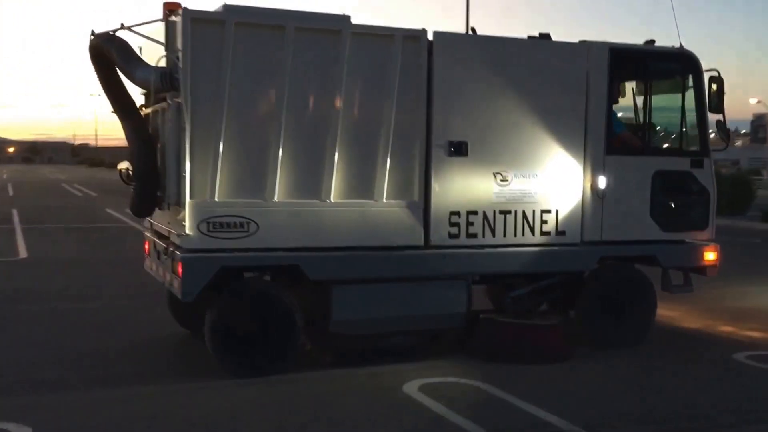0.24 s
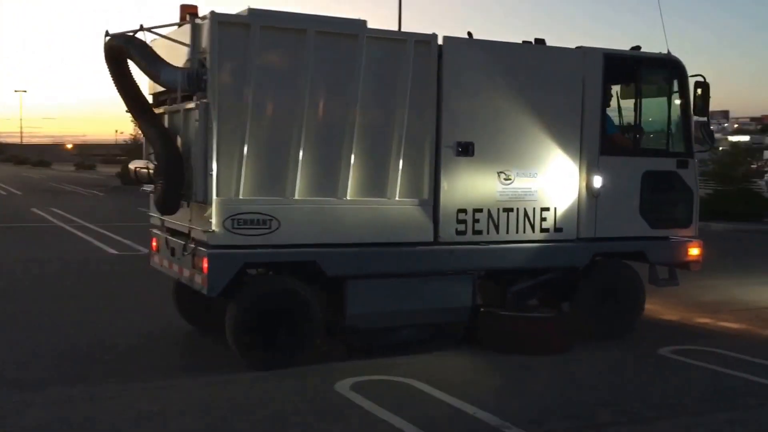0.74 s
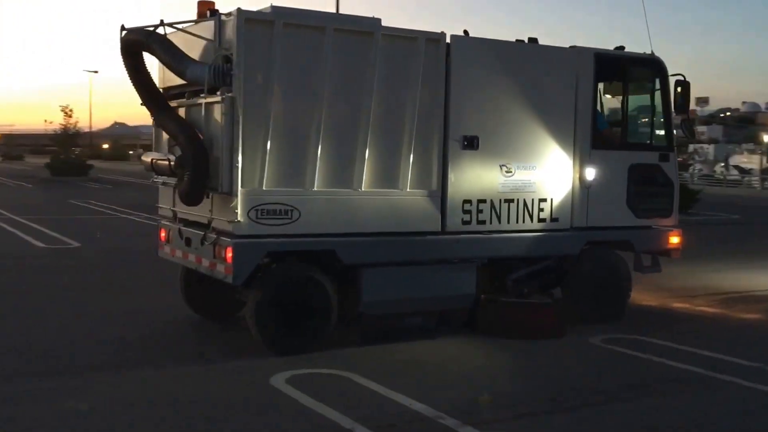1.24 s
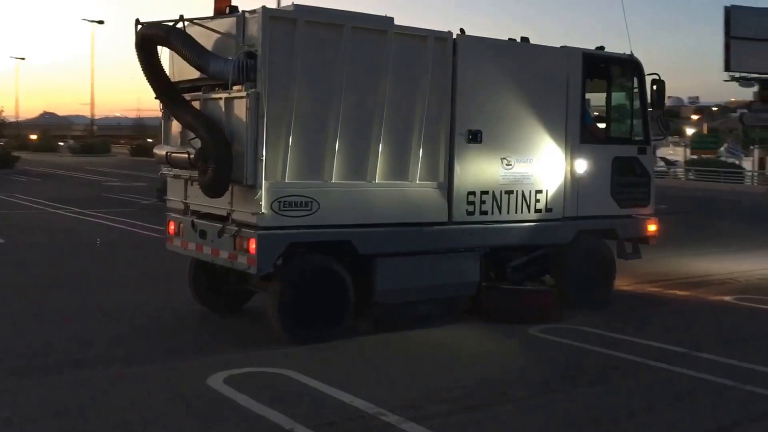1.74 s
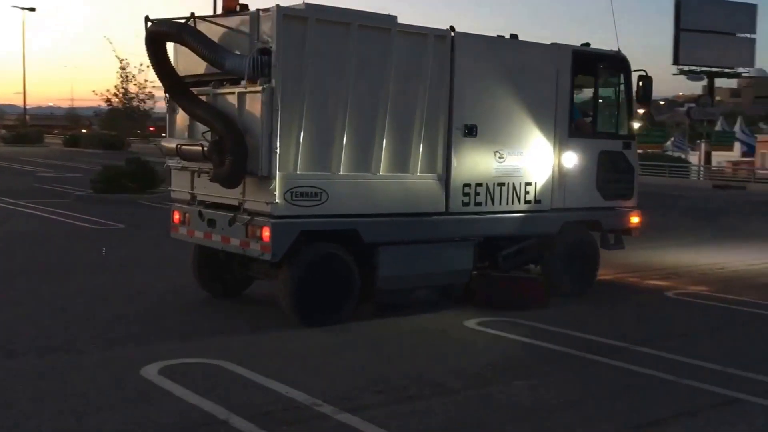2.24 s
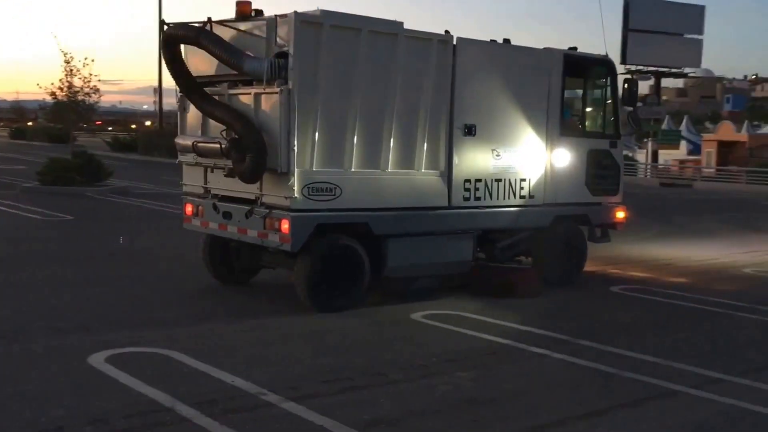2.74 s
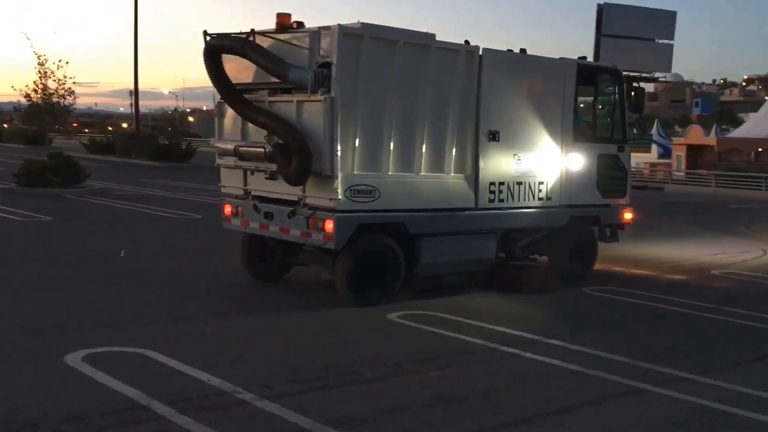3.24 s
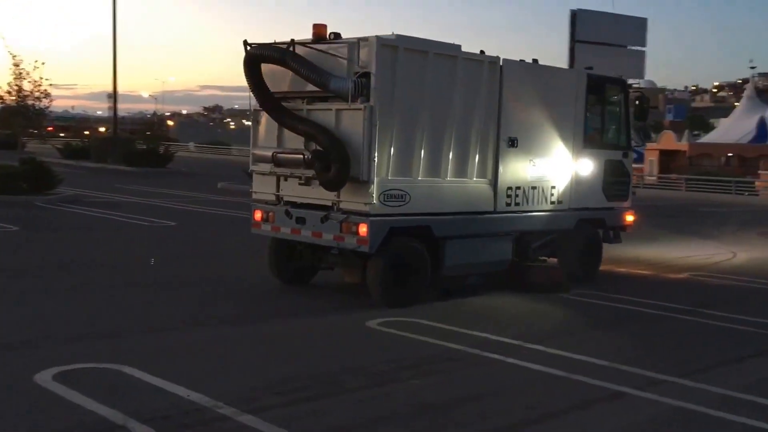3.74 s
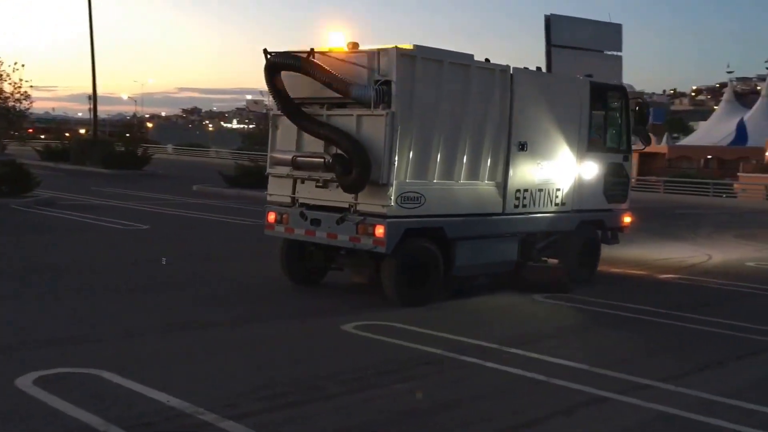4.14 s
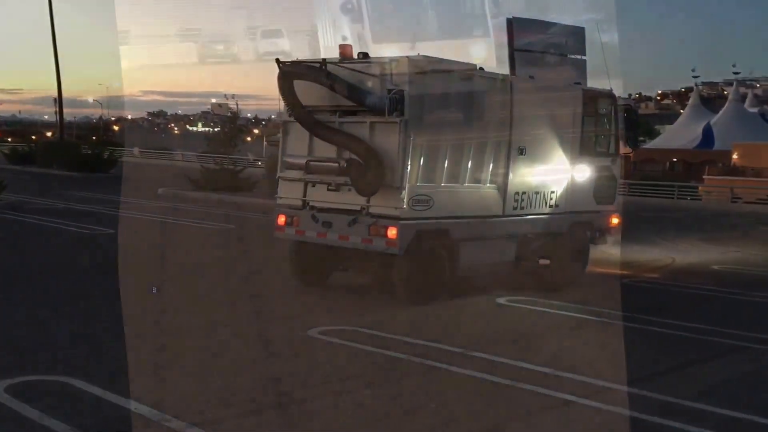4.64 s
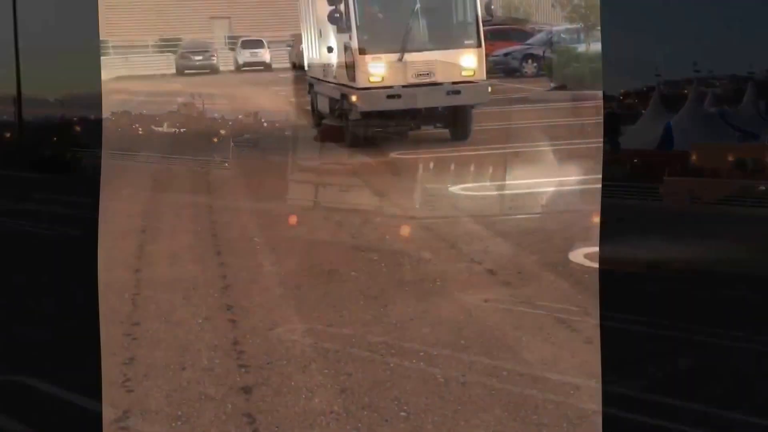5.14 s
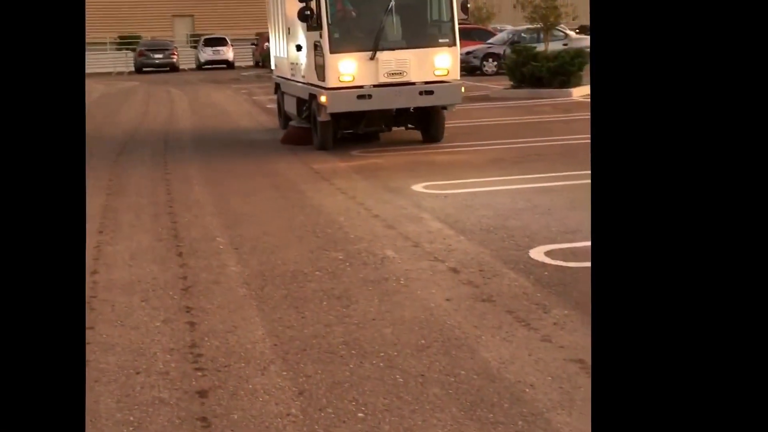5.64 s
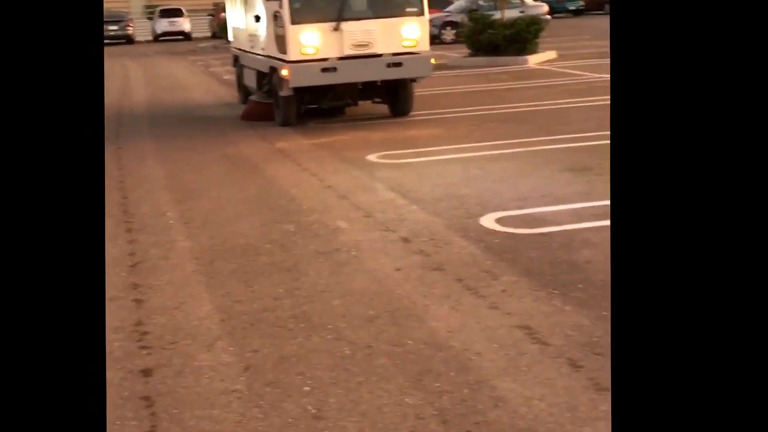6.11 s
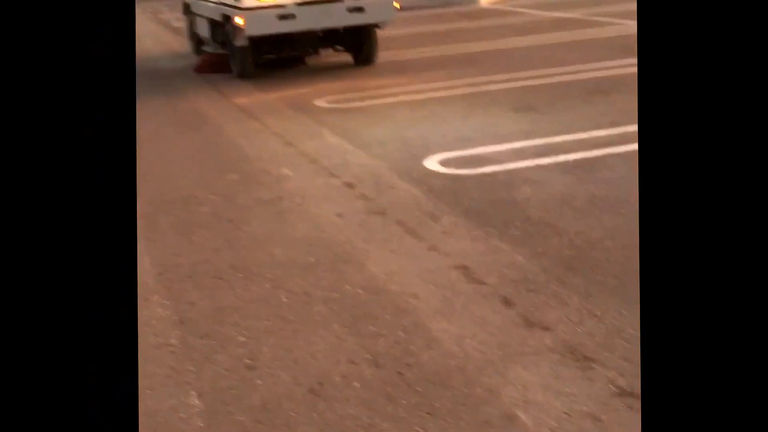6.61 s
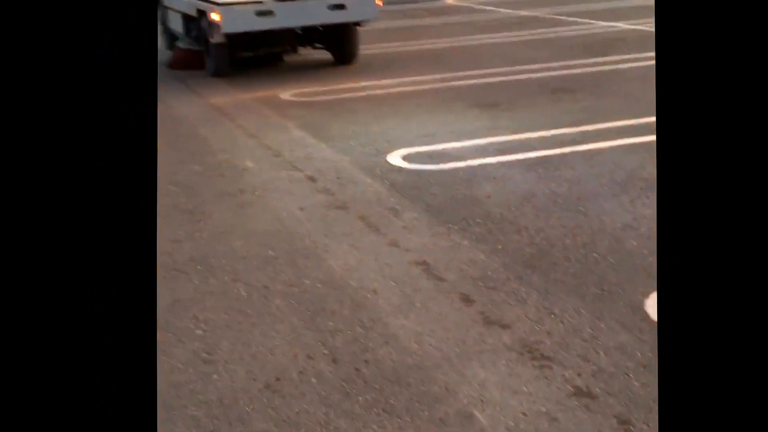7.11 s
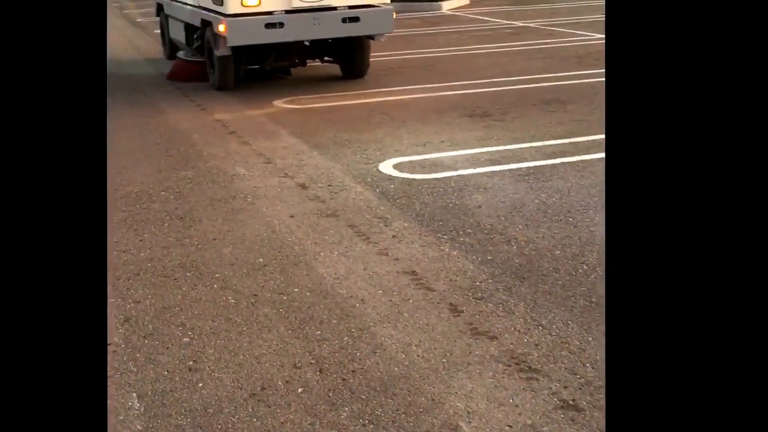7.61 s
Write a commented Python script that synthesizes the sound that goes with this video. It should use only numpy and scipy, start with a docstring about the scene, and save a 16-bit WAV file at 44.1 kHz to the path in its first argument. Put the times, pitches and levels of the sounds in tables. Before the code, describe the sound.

Steady low diesel drone around a hundred hertz, with blower whine, airy roar and bristle hiss; faint panel rattles, then a thinner, less boomy frontal view.

```python
"""A throbbing engine, a rush of air and hissing brooms are heard at once: a street sweeper on a parking lot.
It is heard from the side, then from behind as it drives off and, after a cross-fade, coming head-on.
The four-cylinder engine and its cooling fan, the suction blower, a pump and the duct whistles are drifting tones.
Exhaust flutter, rumble, hopper air and brooms are coloured noise; now and then steel panels rattle."""
import sys
import numpy as np
from scipy import signal
from scipy.fft import rfft, irfft, next_fast_len
from scipy.io import wavfile
from scipy.ndimage import uniform_filter1d

SR = 44100
rng = np.random.default_rng(int(sys.argv[2]) if len(sys.argv) > 2 else 0)


def persist_wave(psi):
    """Save psi, clipped to +-1, as 16-bit WAV."""
    counts = np.round(np.clip(psi, -1, 1) * 32767).astype(np.int16)
    wavfile.write(sys.argv[1], SR, np.atleast_2d(counts).T)


N = 347067
T = np.arange(N) / SR
HZ = np.fft.rfftfreq(N, 1 / SR)

# strength of each source at the reference distance: name: (side level/dB, rear level/dB, front level/dB)
SOURCE_LEVELS = { "firing": (-27.5, -28, -24.5), "boom": (-18, -20, -30), "fan": (-30.5, -29, -40.5),
                 "blower hum": (-43.5, -39, -47.5), "blower whine": (-47.5, -34.5, -45.5),
                 "pump whine": (-38.5, -42, -50.5), "flutter": (-27, -25.5, -29), "rumble": (-30, -27, -30),
                 "roar": (-28.5, -27.5, -32.5), "brooms": (-27.5, -28.5, -32.5), }
# weaker engine tones: (multiple of the firing rate, side level/dB, rear level/dB, front level/dB)
WEAK_ORDERS = [(.75, -45, -45, -54), (1.25, -35, -34, -48), (1.5, -31, -36.5, -38.5), (2.25, -63, -59, -54),
               (2.5, -44, -58, -55), (2.75, -54, -51, -50), (3, -60, -48, -41), (3.25, -39, -59, -57),
               (3.5, -53, -39.5, -51), (4, -56, -43, -43), (5.25, -53, -45, -40.5), (5.75, -42, -45, -49),
               (6.25, -48, -49, -59), (6.5, -42, -47, -44.5), (7.5, -45.5, -52, -50)]
# blower overtones: (multiple of the blade rate, then relative level/dB from the side, rear and front)
BLOWER_OVERTONES = [(2, 1.5, 1, 2), (3, -15, -11, -17), (4, -13, -9, -14)]
# pump tones: (multiple of the blade rate, then relative level/dB from the side, rear and front)
PUMP_TONES = [(1.967, 0, 0, 0), (4.917, -18, -14, -15)]
# air whistling at gaps in the ducts, and one more pump tone at 2763 Hz: (start t/s, end t/s, f/Hz, width/Hz,
# level/dB)
DUCT_WHISTLES = [(0, 7.87, 1641, 18, -47), (0, 4.8, 1700, 60, -44), (0, 4.7, 1240, 30, -45),
                 (.5, 4.5, 2250, 20, -51), (.9, 4.3, 2853, 7, -46), (.4, 3.2, 2808, 14, -53),
                 (4.0, 5.1, 2763, 5, -46), (1.5, 4.8, 5582, 40, -56), (4.9, 7.87, 1700, 50, -45),
                 (5.2, 7.87, 2120, 30, -50), (5.2, 7.87, 2710, 18, -53), (6.0, 6.75, 4285, 30, -46),
                 (5.3, 7.87, 8904, 70, -58)]
# colour of the exhaust flutter: (f/Hz, relative level/dB per Hz)
FLUTTER_SPECTRUM = [(10, -26), (25, -25), (42, -9), (62, 2.5), (92, -1), (120, -5.5), (150, -21),
                    (300, -55)]
# colour of the engine rumble: (f/Hz, then relative level/dB per Hz from the side, rear and front)
RUMBLE_SPECTRA = [(70, -30, -32, -26), (127, -1, 1, 2.5), (145, 0.5, -5, 2.5), (175, -3, 0.5, 3),
                  (203, 3, -1, 0), (227, -1.5, -5.5, -3.5), (236, 4, -4, 0), (318, 0.5, -4.5, -7),
                  (410, -8, -6.5, -6), (467, -12.5, -28.5, -15), (596, -39, -30, -19)]
# colour of the hopper's air roar from each face: (f/Hz, relative level/dB per Hz)
AIR_SIDE = [(300, -50), (490, -18), (560, 2), (670, -0.5), (770, -0.5), (1000, 1.5), (1330, 1), (1480, -4),
            (1660, 3.5), (1900, -2), (2260, 1), (2620, -10), (3000, -10), (3900, -38)]
AIR_REAR = [(300, -29), (490, -6.5), (640, -3), (750, -4.5), (970, 0), (1220, -3), (1430, -7.5), (1650, -1),
            (1800, -4), (1950, -3.5), (2270, -4), (2550, -10), (2850, -6), (3900, -54)]
AIR_FRONT = [(300, -38), (490, -4.5), (590, 1), (680, 5.5), (800, 0.5), (950, 1), (1050, -4.5), (1250, 3.5),
             (1480, 1), (1680, 3.5), (1850, 1.5), (2150, -2.5), (2900, -7.5), (3900, -38)]
# colour of the brooms from each face: (f/Hz, relative level/dB per Hz)
BROOMS_SIDE = [(2000, -18), (3000, -1.5), (3700, -3), (4450, -0.5), (4900, -4.5), (5400, -3.5), (7400, -6),
               (8700, -3), (9900, -6), (10400, -9.5), (11500, -4.5), (13000, -7), (15800, -8)]
BROOMS_REAR = [(2000, -17), (3100, -5.5), (3700, -1.5), (4500, -2.5), (4950, -7.5), (5550, -3),
               (7200, -6.5), (8800, -4.5), (9900, -7.5), (10400, -10.5), (11300, -6.5), (13500, -8),
               (15800, -12)]
BROOMS_FRONT = [(2000, -7), (3000, -4), (3500, 1), (3900, -5), (4300, -0.5), (4850, -7), (5900, -3.5),
                (7600, -3), (8800, -7), (9800, -5), (10450, -7.5), (12000, -2.5), (15800, -8.5)]
# brief rises and dips in the hiss of the brooms: (peak t/s, level change/dB, time from peak to 14 % height/s)
HISS_CHANGES = [(2.113, -3, 0.032), (2.19, 2, .11), (2.33, -1.5, 0.045), (5.12, -1.5, .04),
                (5.23, 1.5, 0.054), (7.77, -2.2, .04), (7.86, 1.5, .05)]
# rattles of the body: (peak t/s, level/dB, time from peak to 14 % height/s)
BODY_RATTLES = [(.665, -27, .02), (.905, -24.5, .02), (1.405, -23.5, .025), (2.89, -27, .018),
                (3.09, -27, .018), (6.13, -31, .015), (6.63, -27, .02), (7.63, -30, .015)]
# what the steel panels ring with: (f/Hz, distance from peak to half gain/Hz, relative level/dB)
PANEL_RINGS = [(677, 120, -6), (945, 150, 3), (1230, 110, 4), (1650, 59, 7), (2360, 510, -0.5)]

# governed speeds, driving away and coming back: (firings a second), (blower blade rate f/Hz)
FIRING_HZ, BLADE_HZ = (51.68, 51.88), (562, 563.3)
# the machine drives off, turning its rear to the listener
START_M, AWAY_M_PER_S = 6.4, 0.67
TURN_START_S, TURN_LENGTH_S = 1.0, 1.28
# cross-fade to the machine coming head-on
FADE_START_S, FADE_LENGTH_S = 4.45, 1.0
FRONT_M, TOWARD_M_PER_S = 8.86, 0.42
REFERENCE_M = 8
# the engine's sound swells and sinks slowly as the machine drives off
SWELL_PEAK_S, SWELL_CYCLE_S = 1.36, 3.32
# the boom swells once every four firings, and no two firings are quite alike
FIRST_THROB_S, THROB_DEPTH, UNEVEN_FIRING = 0.073, 0.28, 0.17
# the outlet swings toward the listener until the cross-fade, which makes the blower hum grow by this much
OUTLET_SWING_DB = 7.5
EDGE_HZ = 15800  # top of the sound's frequency range


def gain_of(db):
    """Turns decibels into amplitude."""
    return 10 ** (np.asarray(db) / 20)


def evened(x):
    """Scales a signal to rms 1."""
    return x / np.sqrt(np.mean(x ** 2) + 1e-20)


def noise(gain):
    """Noise of rms 1 with the given gain at each frequency."""
    size = next_fast_len(N)
    shape = np.interp(np.fft.rfftfreq(size, 1 / SR), HZ, gain)
    spectrum = rfft(rng.standard_normal(size))
    return evened(irfft(spectrum * shape, size)[:N])


def coloured(points):
    """Noise shaped by (f/Hz, level/dB) points, dying away above the last."""
    f, db = np.transpose(points)
    gain = gain_of(np.interp(np.log(HZ + 1), np.log(f + 1), db))
    return noise(gain / (1 + (HZ / (2 * f[-1])) ** 2))


def wander(hz):
    """Random values joined by lines, about hz swings a second; after 512 / hz seconds it stays still."""
    knots = rng.standard_normal(1024)
    return np.interp(2 * hz * T, np.arange(len(knots)), knots)


def resonance(hz, width):
    """Gain of something that rings near one frequency: 1 at the peak, half at one width away."""
    return 1 / (1 + ((HZ - hz) / width) ** 2)


def bump(s, length):
    """A smooth rise and fall of height 1 around the time s."""
    return np.exp(-2 * ((T - s) / length) ** 2)


def ramp(start, length):
    """Goes from 0 to 1 over the given stretch of time."""
    return np.clip((T - start) / length, 0, 1)


def passes():
    """Amplitude of the departing and the approaching machine: closer is louder, times the cross-fade."""
    fade = ramp(FADE_START_S, FADE_LENGTH_S)
    away_m = START_M + AWAY_M_PER_S * T
    toward_m = FRONT_M - TOWARD_M_PER_S * (T - FADE_START_S)
    return (1 - fade) * REFERENCE_M / away_m, fade * REFERENCE_M / toward_m


def weights():
    """Share of the side, the rear and the front in the power that is heard."""
    away, toward = passes()
    turned = ramp(TURN_START_S, TURN_LENGTH_S)
    power = np.array([(1 - turned) * away ** 2, turned * away ** 2, toward ** 2])
    return power / (away ** 2 + toward ** 2)


def level(source):
    """Amplitude of a source, mixed from the faces turned to the listener."""
    return np.sqrt(gain_of(SOURCE_LEVELS[source]) ** 2 @ weights())


def viewed(spectra):
    """Noise whose colour follows the face turned to the listener."""
    return sum(np.sqrt(share) * coloured(points) for share, points in zip(weights(), spectra))


def partial(turns, waver, waver_hz):
    """A tone of rms about 1 whose strength and phase drift a little."""
    strength = 1 + waver * wander(waver_hz)
    phase_drift = waver * wander(waver_hz)
    return np.sqrt(2) * strength * np.cos(2 * np.pi * turns + phase_drift)


def rotation(speeds, drift):
    """Turns counted at a governed speed that drifts by a small share."""
    hz = speeds[0] + (speeds[1] - speeds[0]) * ramp(FADE_START_S, FADE_LENGTH_S)
    return np.cumsum(hz * (1 + drift * wander(1))) / SR


def swell(depth_db):
    """Gain of the slow swell, which ends with the cross-fade; a negative depth sinks instead."""
    departing = 1 - ramp(FADE_START_S, FADE_LENGTH_S)
    return gain_of(depth_db * departing * np.cos(2 * np.pi * (T - SWELL_PEAK_S) / SWELL_CYCLE_S))


def eddies(x, patchy_db):
    """Turbulence lifts and drops narrow patches of the spectrum for a few hundredths of a second."""
    z = signal.stft(x, nperseg=1024, noverlap=768)[2]
    patches = uniform_filter1d(rng.standard_normal(z.shape), size=4, axis=0)  # across frequency
    patches = uniform_filter1d(patches, size=6, axis=1)  # across time
    patchy = z * gain_of(patchy_db * evened(patches))
    return evened(signal.istft(patchy, nperseg=1024, noverlap=768)[1][:N])


def order(firings, k, waver):
    """Engine tone at k times the firing rate; the exhaust pipe delays high orders more than low ones."""
    return partial(k * firings - 0.0601 * k ** 2, waver, 3)


def boom_throb(firings):
    """Strength of the exhaust boom: a beat every four firings, plus random unevenness."""
    cycles = (firings - FIRST_THROB_S * FIRING_HZ[0]) / 4
    depth = THROB_DEPTH * (1 + .4 * wander(5))
    throb = 1 + depth * np.cos(2 * np.pi * cycles + .4 * wander(2))
    return throb + UNEVEN_FIRING * wander(14)


def engine(firings):
    """Firing note, exhaust boom and fan hum; unequal cylinders add quarter orders."""
    firing_note = level("firing") * order(firings, 0.99, .08)
    boom = level("boom") * swell(depth_db=1) * boom_throb(firings) * order(firings, 2, 0.027)
    fan = level("fan") * swell(depth_db=3.6) * partial(5 * firings, .06, 5)
    shares = weights()
    uneven = sum((gain_of(faces) @ shares) * order(firings, k, .15) for k, *faces in WEAK_ORDERS)
    return firing_note + boom + fan + swell(depth_db=0.5) * uneven


def whines(waver=0.28):
    """The blower's blade tone with its overtones, and a pump that beats against it."""
    turns = rotation(BLADE_HZ, drift=0.00107)
    shares = weights()
    outlet = gain_of(OUTLET_SWING_DB * (ramp(0, FADE_START_S) - 1))
    out = level("blower hum") * outlet * partial(turns, waver, 9)
    for source, partials in (("blower whine", BLOWER_OVERTONES), ("pump whine", PUMP_TONES)):
        strength = level(source)
        for k, *faces in partials:
            out += strength * (gain_of(faces) @ shares) * partial(k * turns, waver, 9)
    return out


def whistles(fade_s=0.17):
    """Air whistling in duct gaps, plus one pump tone: tones of jittery pitch that fade in and out at their
    listed times."""
    out = np.zeros(N)
    for start, end, hz, width, db in DUCT_WHISTLES:
        heard = np.clip(np.minimum(T - start, end - T) / fade_s, 0, 1)
        pitch = hz + .8 * width * wander(2 * width)
        turns = np.cumsum(pitch) / SR
        out += gain_of(db) * heard * partial(turns, .25, width)
    return out


def exhaust_flutter():
    """Low noise from the exhaust, swelling slowly."""
    return level("flutter") * swell(depth_db=3.0) * coloured(FLUTTER_SPECTRUM)


def engine_rumble():
    """Low engine noise, coloured by the face in view; it sinks while the other engine sounds swell."""
    hz, *faces = np.transpose(RUMBLE_SPECTRA)
    spectra = [np.column_stack([hz, db]) for db in faces]
    return level("rumble") * swell(depth_db=-1.25) * viewed(spectra)


def hopper_roar(firings, knock=0.1, gust_db=-0.1):
    """Turbulent air in the hopper; each firing pushes the roar up."""
    pulsing = 1 + knock * np.cos(2 * np.pi * firings)
    air = eddies(viewed([AIR_SIDE, AIR_REAR, AIR_FRONT]), patchy_db=2.04)
    return level("roar") * gain_of(gust_db * wander(16)) * pulsing * air


def brooms(flicker_db=0.3):
    """Bristles hissing on asphalt: patchy noise whose level flickers, with brief rises and dips."""
    bristles = eddies(viewed([BROOMS_SIDE, BROOMS_REAR, BROOMS_FRONT]), patchy_db=1.2)
    change_db = sum(db * bump(s, length) for s, db, length in HISS_CHANGES)
    change_db = change_db + flicker_db * wander(11)
    return level("brooms") * gain_of(change_db) * bristles


def rattles(knocks_hz=150):
    """Short shudders of the ringing steel panels; quick random knocks roughen those before 3.4 s."""
    ring = noise(sum(gain_of(db) * resonance(hz, width) for hz, width, db in PANEL_RINGS))
    chatter = evened(.5 + abs(wander(knocks_hz)))
    shudders = sum(gain_of(db) * bump(s, length) for s, db, length in BODY_RATTLES)
    return ring * chatter * shudders


def scene():
    """The whole machine in the open air, the same in both channels."""
    firings = rotation(FIRING_HZ, drift=.0005)
    nearness = np.hypot(*passes())
    tones = engine(firings) + whines()
    noises = exhaust_flutter() + engine_rumble() + hopper_roar(firings) + brooms()
    # whistles and rattles keep their listed levels at any distance
    machine = nearness * (tones + noises) + whistles() + rattles()
    return np.array([machine, machine])


def record(dry):
    """Cuts away the frequencies above the edge with a steep low-pass filter."""
    low_pass = signal.firwin(1023, EDGE_HZ, window=("kaiser", 9), fs=SR)
    return signal.oaconvolve(dry, low_pass[None], "same")


dry = scene()
out = record(dry)
persist_wave(out)
```